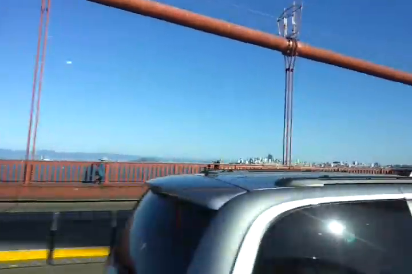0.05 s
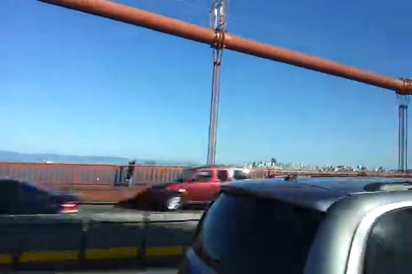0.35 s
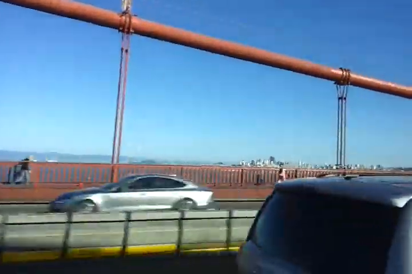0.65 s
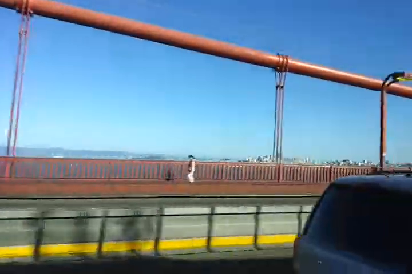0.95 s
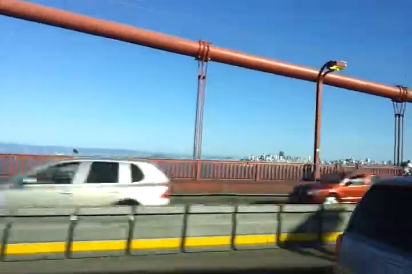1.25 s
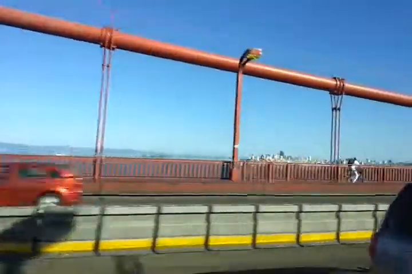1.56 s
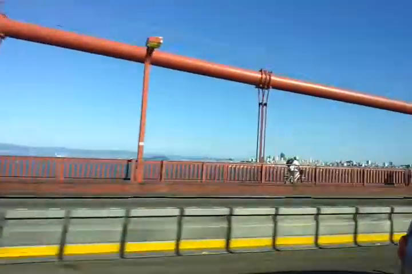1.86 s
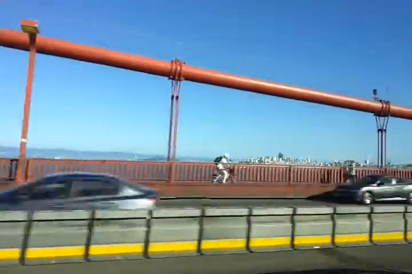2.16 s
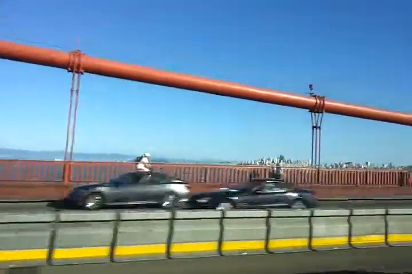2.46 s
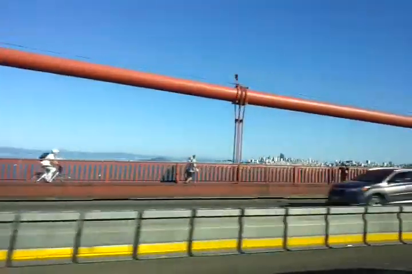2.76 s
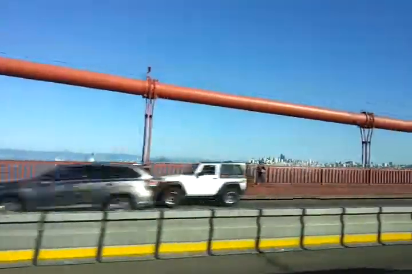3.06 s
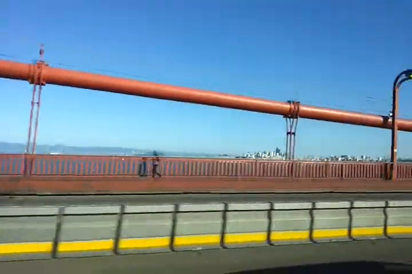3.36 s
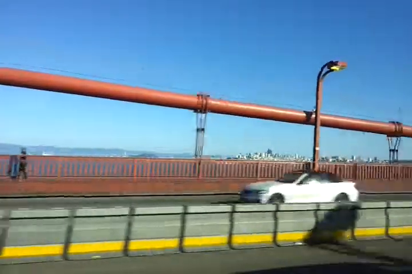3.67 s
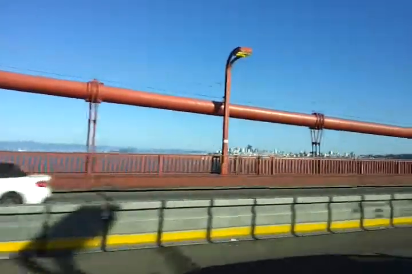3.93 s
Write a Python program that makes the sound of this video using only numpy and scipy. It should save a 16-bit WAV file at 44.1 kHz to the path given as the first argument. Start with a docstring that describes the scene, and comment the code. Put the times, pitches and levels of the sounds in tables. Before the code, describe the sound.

Inside a car crossing a bridge, the tyres hit evenly spaced joints with booming double thumps over steady road roar. Something hard clacks close by near the start, passing traffic hisses softly and loose plastic ticks faintly.

```python
"""Front and then rear wheels thump over evenly spaced bridge joints, heard inside a car in traffic.
Each blow is a tyre slap, a floor thud and a body thump, with a cabin boom and a bounce of the springs.
Underneath, the tyres roar through the body, the cabin drones and hums, wind hisses at the window
and the hiss of other cars swells as they pass. Something hard knocks once close by,
and the loose trim ticks faintly."""
import sys
import numpy as np
from scipy import signal
from scipy.fft import rfft, irfft
from scipy.io import wavfile
from scipy.ndimage import uniform_filter1d

SR = 44100
rng = np.random.default_rng(int(sys.argv[2]) if len(sys.argv) > 2 else 0)


def output_pcm(signal):
    """Save a mono or channel-first signal as 16-bit PCM at the path in sys.argv[1].

    Samples are clipped to [-1, 1] before scaling.
    """
    pcm = np.clip(np.atleast_2d(signal).T, -1, 1) * 32767
    wavfile.write(sys.argv[1], SR, np.round(pcm).astype(np.int16))


N = 176400  # 4 s


def amp(db):
    """Decibels to gain."""
    return 10 ** (np.asarray(db) / 20)


def unit(x):
    """Scales to rms 1."""
    return x / np.sqrt(np.mean(x ** 2) + 1e-20)


def colour(points, hz):
    """Reads an EQ curve in dB on a log-frequency axis."""
    f, db = np.transpose(points)
    return np.interp(np.log(hz + 1), np.log(f), db)


def fader(points):
    """Reads a fader ride at every sample."""
    return np.interp(np.arange(N) / SR, *np.transpose(points))


def add(mix, start_s, sound):
    """Drops a sound into the mix at its cue."""
    part = mix[max(round(start_s * SR), 0):][:len(sound)]
    part += sound[:len(part)]


def band_noise(eq):
    """One second of coloured noise with an evened envelope, so that blows keep their strength."""
    shape = amp(colour(eq, np.arange(SR // 2 + 1)))
    analytic = signal.hilbert(irfft(shape * rfft(rng.standard_normal(SR))))
    even = rfft(analytic.real / (abs(analytic) + 1e-12))
    return unit(irfft(shape * even / (abs(even) + 1e-12)))


def envelope(rise, hold, t60):
    """One second of attack, hold and exponential release; times in seconds."""
    t = np.arange(SR) / SR
    attack = np.minimum(t / max(rise, 1e-5), 1)
    return attack * amp(-60 * np.maximum(t - rise - hold, 0) / t60)


def rush(eq, patch_db, swell_db):
    """Turbulent noise: a spectrum with drifting patches and a slow swell."""
    frames, hz = N // 512 + 6, np.fft.rfftfreq(2048, 1 / SR)
    real, imag, patches = rng.standard_normal((3, frames, len(hz)))
    patches = uniform_filter1d(patches, size=6, axis=0)  # smooth in time
    patches = unit(uniform_filter1d(patches, size=14, axis=1))  # and in frequency
    swell = unit(uniform_filter1d(rng.standard_normal(frames), size=14))[:, None]
    spectra = (real + 1j * imag) * amp(colour(eq, hz) + patch_db * patches + swell_db * swell)
    return unit(signal.istft(spectra.T, nperseg=2048, noverlap=1536)[1][:N])


# EQ of the other cars' tyre hiss: f/Hz, relative level/dB
TRAFFIC_EQ = [(1000, -3), (3000, 0.5), (4500, 0), (5100, -1.5), (5700, -6), (6300, -8), (6900, -10),
              (7400, -21.5), (7750, -56.5)]
# Fader ride on that hiss: t/s, relative level/dB
TRAFFIC_RIDE = [(0, -41), (.1, -40.5), (.25, -43.5), (.75, -42.5), (1.05, -47.5), (1.4, -47.5), (1.8, -47),
                (2.4, -48.5), (2.58, -42), (2.9, -48), (3.2, -44), (3.6, -47), (4, -47)]


def traffic_hiss(gain_db=5.5):
    """Tyre hiss swells as other cars go by."""
    return amp(fader(TRAFFIC_RIDE) + gain_db) * rush(TRAFFIC_EQ, patch_db=2, swell_db=0.3)


# EQ of the wind at the window seal: f/Hz, relative level/dB
WIND_EQ = [(1500, -30.5), (2600, -16), (2850, -4.5), (3080, -2.5), (3400, 1), (3780, -1.5), (4150, -14.5),
           (5000, -28.5), (7300, -51.5), (7800, -92)]


def window_wind(level_db=-32):
    """Air hisses past the window seal in a narrow, bright band."""
    return amp(level_db) * rush(WIND_EQ, patch_db=0.96, swell_db=-0.33)


# Panel and air resonances: f/Hz, width/Hz, level/dB
CABIN_MODES = [(92.6, 12, -33), (116, 16, -31.5), (277, 19, -35), (402, 8.5, -37), (519, 31, -41),
               (645, 16, -43), (835, 12, -43.5), (1573, 71, -44.5), (3096, 210, -42.5)]


def cabin_hum():
    """Narrow resonances, excited by road and wind, hum unevenly under the roar."""
    hz, out = np.fft.rfftfreq(N, 1 / SR), np.zeros(N)
    for centre_hz, width_hz, db in CABIN_MODES:
        peak = 1 / (1 + ((hz - centre_hz) / width_hz) ** 2) ** 2
        out += amp(db) * unit(irfft(peak * rfft(rng.standard_normal(N)), N))
    return out


# Fader ride on the cabin drone: t/s, level/dB
DRONE_RIDE = [(0, -28.5), (.15, -22), (.48, -22.5), (.65, -39.5), (1.5, -35.5), (2.15, -33.5), (2.3, -24),
              (2.8, -26.5), (3, -31), (3.2, -22), (3.4, -34), (3.75, -20.5), (4, -35)]


def cabin_drone(pitch_hz=51.65, wander_depth=0.026):
    """The running car holds a low, wavering note."""
    wander = unit(uniform_filter1d(rng.standard_normal(N), size=5000))
    turns = np.cumsum(pitch_hz * (1 + wander_depth * wander)) / SR
    return amp(fader(DRONE_RIDE)) * unit(np.sin(2 * np.pi * turns))


# EQ of the road roar in the cabin: f/Hz, relative level/dB
ROAD_EQ = [(12, -20.5), (25, -2.5), (55, -4.5), (74, -5.5), (100, -7.5), (130, -5), (150, 0), (185, -5),
           (230, -4.5), (280, -4.5), (325, -3.5), (365, -9.5), (470, -15), (530, -12), (700, -13.5),
           (780, -16.5), (930, -14), (1060, -19), (1200, -18), (1750, -21.5), (2400, -27.5), (4200, -43),
           (7300, -68), (7800, -100)]


def road_roar(level_db=-20):
    """The car's own tyres lay down a dark bed, heard through floor and doors."""
    return amp(level_db) * rush(ROAD_EQ, patch_db=0.85, swell_db=0.5)


# Cues for the trim: t/s, level before the low-pass/dB, centre f/Hz, half width/octaves, t60/s
TICK_CUES = [(1.639, -16.5, 3370, 0.22, 0.042), (1.655, -22.5, 3270, 0.31, 0.061),
             (2.322, -21.5, 3380, 0.23, 0.03), (2.949, -20, 1550, 0.72, 0.028),
             (3.103, -12.5, 1750, 1.1, 0.0088), (3.11, -19, 1750, 1.2, .018),
             (3.178, -20.5, 1250, 0.75, 0.029), (3.591, -17.5, 1490, 1.1, 0.023)]


def trim_ticks(lowpass_hz=4200):
    """Loose plastic gives dry ticks, each in its own band, with the top rolled off."""
    out, hz = np.zeros(N), np.geomspace(100, 12000, num=48)
    for start_s, db, centre_hz, octaves, t60 in TICK_CUES:
        eq = np.column_stack([hz, -6 * (np.log2(hz / centre_hz) / octaves) ** 2])
        add(out, start_s, amp(db) * band_noise(eq) * envelope(0.00054, 0.00016, t60))
    return signal.sosfilt(signal.butter(8, lowpass_hz, fs=SR, output="sos"), out)


# Cues for one knock and its two quick rebounds: t/s, level/dB
KNOCK_CUES = [(0.3033, -10.5), (0.306, -16), (0.3076, -19)]
# EQ of its crack: f/Hz, relative level/dB
CRACK_EQ = [(300, -28), (1000, -1), (1600, -8), (2100, -4.5), (2600, 1), (3700, -4.5), (4400, 2),
            (5200, -2), (6200, -7.5), (7400, -9.5), (7900, -37), (8600, -35), (9200, -68)]
# Modes of its ring: f/Hz, relative level/dB, t60/s
RING_MODES = [(2880, -15, 0.016), (3120, -4, 0.061), (3601, -13, .03), (4200, -8, 0.042),
              (4457, -6.5, 0.036), (5160, -20, .05), (5720, -24, .058), (6240, -12.5, .04),
              (7050, -21, 0.04)]


def knock(tail_db=-21):
    """Something hard clacks close by: a crack, a short ring and a brief cabin tail."""
    out, t = np.zeros(N), np.arange(SR) / SR
    snap = envelope(rise=0.0004, hold=0, t60=0.032)
    tail = amp(tail_db) * envelope(rise=0.0019, hold=0, t60=0.2)
    for start_s, db in KNOCK_CUES:
        crack = band_noise(CRACK_EQ) * (snap + tail)
        ring = sum(amp(mode_db) * envelope(0, 0, t60) * np.sin(2 * np.pi * (hz * t + rng.random()))
                   for hz, mode_db, t60 in RING_MODES)
        add(out, start_s, amp(db) * (crack + ring))
    return out


# EQ of the body's deep thump: f/Hz, relative level/dB
THUMP_EQ = [(15, -26), (35, -11), (68, -7.5), (92, -3), (115, -0.5), (135, -8), (220, -9), (380, -16),
            (600, -34), (1500, -65), (7000, -110)]
# EQ of the tyre's midrange slap: f/Hz, relative level/dB
SLAP_EQ = [(150, -16), (350, -7.5), (480, -8.5), (590, -4.5), (655, 0.5), (700, -1), (755, -1.5),
           (830, -11), (1000, -21.5), (2000, -31), (6000, -55.5), (8000, -100)]
# Cues for axles hitting joints, front then rear:
# t/s, thump level/dB, slap level/dB, rise of both/s, thud level/dB, boom level/dB, bounce level/dB
AXLE_CUES = [(0.039, -18, -18.5, 0.0022, -27, -32, -32), (.163, -12.5, -21, 0.012, -9, -14.5, -15),
             (.79, -40, -29, 0.012, -25, -41, -40), (0.99, -18, -33, 0.0075, -15, -33, -36),
             (1.598, -27.5, -23.5, 0.011, -13.5, -28, -10), (1.804, -19, -18.5, 0.0037, -8.5, -14, -10),
             (2.43, -28, -26.5, 0.027, -28, -40, -25), (2.616, -21, -20, 0.011, -14, -24, -33),
             (3.226, -20.5, -18, 0.0096, -20, -34, -13.5), (3.428, -14, -15, 0.004, -8, -25, -27)]


def deck_joints(thud_hz=90.7, boom_hz=116.4, bounce_hz=39.4):
    """Each axle slaps the joint, shakes the body, thuds into the floor and sets the cabin air booming."""
    out, t = np.zeros(N), np.arange(SR) / SR
    thud = -np.sin(2 * np.pi * thud_hz * t) * envelope(rise=0.005, hold=0, t60=0.2)
    boom_swell = envelope(rise=0.089, hold=0.032, t60=0.38)
    delay_s, width_s = 0.064, 0.016  # the suspension rebounds a moment after the blow
    bounce = np.sin(2 * np.pi * bounce_hz * t) * np.exp(-((t - delay_s) / width_s) ** 2)
    for start_s, thump_db, slap_db, rise, thud_db, boom_db, bounce_db in AXLE_CUES:
        thump = band_noise(THUMP_EQ) * envelope(rise, hold=0.031, t60=0.32)
        slap = band_noise(SLAP_EQ) * envelope(rise, hold=0.0064, t60=0.15)
        boom = np.sin(2 * np.pi * (boom_hz * t + rng.random())) * boom_swell
        impact = amp(thump_db) * thump + amp(slap_db) * slap + amp(thud_db) * thud
        add(out, start_s, impact + amp(boom_db) * boom + amp(bounce_db) * bounce)
    return out


def scene():
    """Mono mix inside the car: the driving bed with the hits on top."""
    bed = road_roar() + cabin_hum() + window_wind() + traffic_hiss() + cabin_drone()
    return (bed + deck_joints() + knock() + trim_ticks())[None]


def record(dry):
    """A soft clip rounds off the highest peaks, then a steep low-pass takes off the top."""
    ceiling, cutoff_hz = 0.78, 8960
    rounded = dry / (1 + (dry / ceiling) ** 8) ** (1 / 8)
    lowpass = signal.firwin(511, cutoff_hz, window=("kaiser", 9), fs=SR)
    return signal.oaconvolve(rounded, lowpass[None], "same")


dry = scene()
out = record(dry)
output_pcm(out)
```